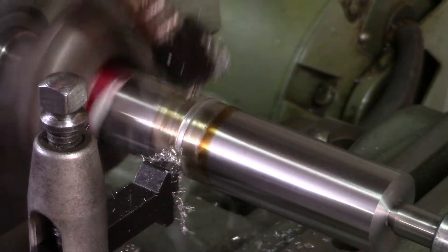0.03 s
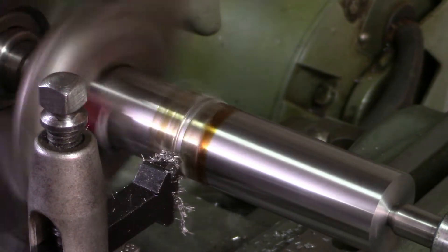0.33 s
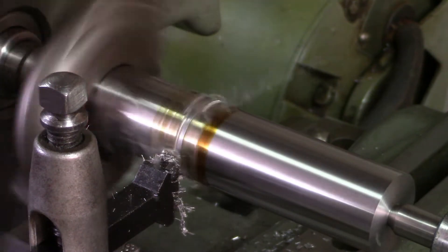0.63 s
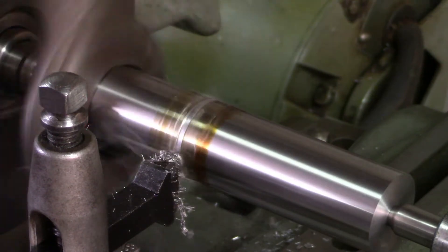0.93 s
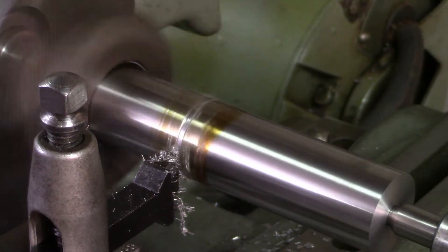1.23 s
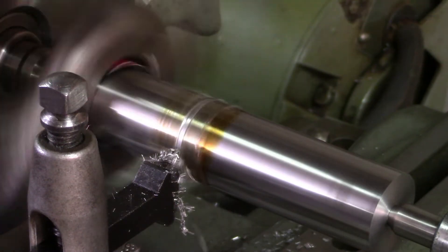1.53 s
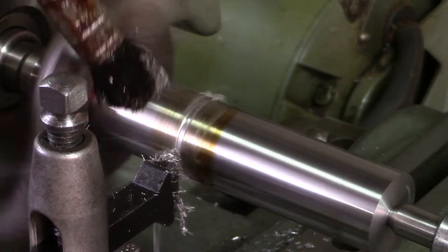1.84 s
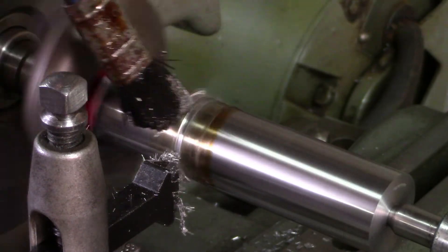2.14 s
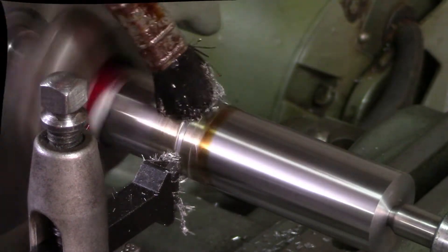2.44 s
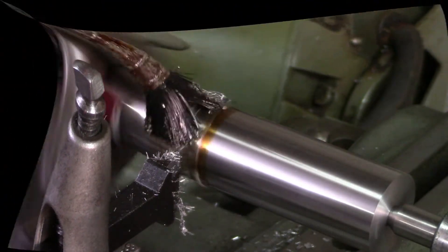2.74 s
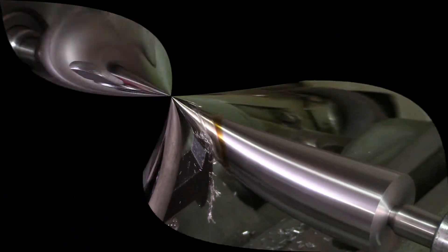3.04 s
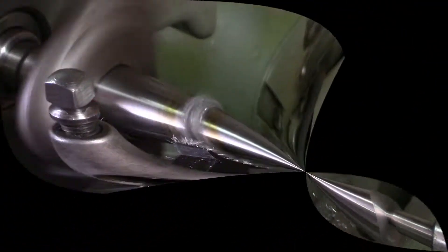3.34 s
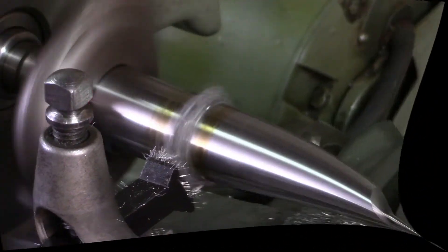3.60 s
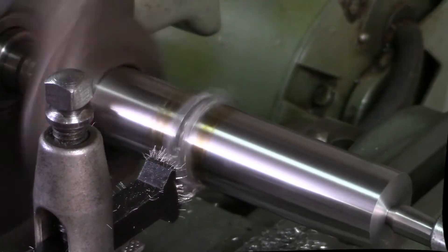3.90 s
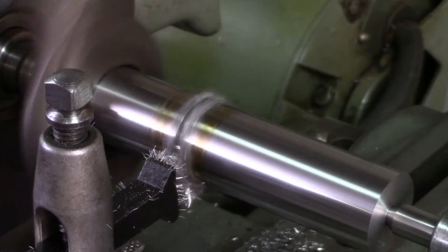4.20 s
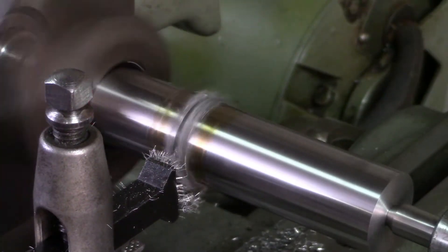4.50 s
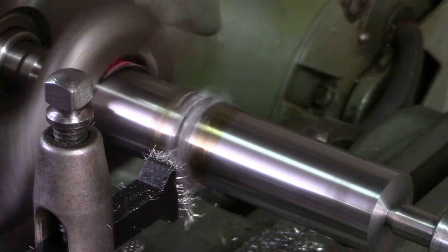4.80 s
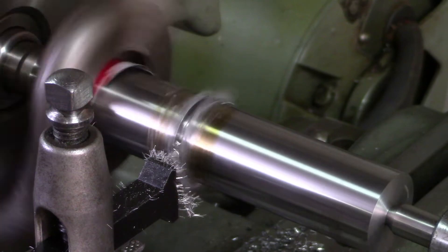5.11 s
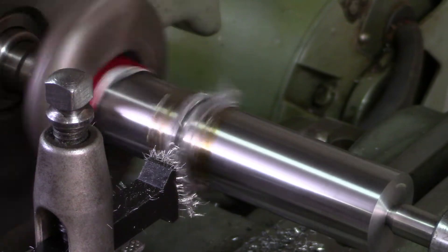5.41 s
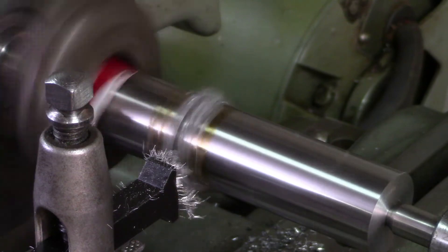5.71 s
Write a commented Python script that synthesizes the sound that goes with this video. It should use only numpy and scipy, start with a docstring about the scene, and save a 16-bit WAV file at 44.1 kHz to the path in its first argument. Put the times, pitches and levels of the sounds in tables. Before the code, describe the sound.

A lathe blade cuts into a spinning steel bar, close up in a workshop, over a steady gear rumble and faint whine. The cut rasps and sizzles, with small chip snaps, groans and thin whistles. About two seconds in, the blade squawks several times, once per turn. It then locks into a loud, harsh ringing chatter that breaks into short stutters.

```python
"""A lathe blade parts off a steel bar close by, over the rumble and whine of the headstock gears.
Brittle chips crack off in a rasp that swells with each turn; stick-slip adds groans and whistles.
Oiled, the blade squawks once a turn, swinging at its own pitch and slapping the bar each cycle.
It then chatters in a harsh ringing tone that breaks into stutters."""
import sys
import numpy as np
from scipy import signal
from scipy.fft import rfft, irfft
from scipy.io import wavfile
from scipy.ndimage import uniform_filter1d

SR = 44100
rng = np.random.default_rng(int(sys.argv[2]) if len(sys.argv) > 2 else 0)


def pcm_store(signal):
    """Save signal as 16-bit PCM."""
    levels = np.round(np.clip(np.atleast_2d(signal), -1, 1) * 32767)
    wavfile.write(sys.argv[1], SR, levels.astype(np.int16).T)


N = 253575
TIME_S = np.arange(N) / SR
FREQ_HZ = np.fft.rfftfreq(N, 1 / SR)
TURN_S, HIGH_SIDE_S = .268, 2.3  # one turn of the bar; a time when its high side meets the blade
LOCK_S = .003  # half the time the blade takes to lock or let go

# Resonances of blade, tool post and bar. Each row: centre in Hz, width in Hz, lift in dB.
STEEL_MODES = [(884, 23, 7), (940, 15, 4.5), (1380, 58, 0), (1692, 42, 8.5), (1866, 64, 7),
               (2260, 130, 7.5), (2474, 154, 7), (2730, 31, 2.5), (3000, 60, 6), (3120, 90, 8.5),
               (3271, 130, 7), (4700, 190, 6), (5300, 250, 5), (6400, 230, 7.5), (7030, 230, 8),
               (7680, 260, 7), (8640, 390, 6.5), (9780, 1200, 9), (12520, 380, 12.5), (14250, 400, 5)]
# Weight of the cut. Each row: time in seconds, relative rasp level in dB, relative fizz level in dB.
CUT_DB = [(0, -48.5, -45.5), (.05, -48, -50), (.09, -45, -43.5), (.16, -42, -43), (.22, -51, -50.5),
          (.37, -47, -49), (.42, -44.5, -46), (.435, -42, -43.5), (.88, -40, -43), (.97, -48.5, -47),
          (1.05, -42.5, -48.5), (1.19, -45.5, -47), (1.225, -40, -42), (1.56, -41.5, -44.5),
          (1.72, -44, -44.5), (1.83, -41, -45), (2.3, -47, -48.5), (2.76, -49, -51), (2.86, -46, -47),
          (3.7, -48.5, -49), (4.1, -40, -43), (4.3, -41.5, -44.5), (5.75, -42, -43)]
# Spectrum of the cut. Each row: frequency in Hz, gain in dB.
CUT_COLOUR_DB = [(260, -25), (450, -9), (570, 0.5), (712, -26), (903, 3.5), (1020, 5), (1290, 4),
                 (1710, -3.5), (2010, -10.5), (3090, -9), (4210, -21.5), (7070, -26), (11200, -44.5),
                 (12400, -47.5), (15500, -49)]
# Finest sizzle of the chips. Each row: time in seconds, level in dB.
SIZZLE_DB = [(.41, -85), (.43, -67), (.84, -65), (.96, -78), (1.17, -69), (1.23, -65), (1.5, -67),
             (2.0, -69), (2.76, -80), (2.84, -64), (3.22, -78), (3.4, -70), (4.3, -67.5), (5.75, -69)]
# Sizzle spectrum. Each row: frequency in Hz, gain in dB.
SIZZLE_COLOUR_DB = [(10500, -35), (11400, -10), (11900, -14), (12500, 0), (13200, -17), (14250, -3),
                    (15500, -13)]
# Headstock loudness. Each row: time in seconds, relative level in dB.
DRIVE_DB = [(0, -40.5), (2.2, -41.5), (2.72, -49), (2.87, -42.5), (3.5, -47), (3.67, -53), (4.3, -43.5),
            (5.75, -46)]
# Rumble spectrum. Each row: frequency in Hz, gain in dB.
RUMBLE_COLOUR_DB = [(20, -38), (55, -13), (102, -21), (120, -7), (160, -6), (195, -15), (250, -5),
                    (285, -9), (330, -1.5), (370, 5.5), (405, 2), (445, -9), (600, -1.5), (780, 0.5),
                    (1000, -8.5), (3000, -71)]
# Gear mesh tones. Each row: pitch in Hz, level at full drive in dB.
GEAR_TONES = [(389, -49.5), (479, -60), (641, -53.5), (801, -55.5)]
# Loose stick-slip. Each row: middle in seconds, length in seconds, top pitch in Hz, level in dB.
GROAN_RUBS = [(.01, .1, 924.7, -35.5), (.245, 0.11, 941, -32), (.54, 0.16, 1139, -34),
              (.96, 0.093, 994, -32.5), (1.11, .14, 1320, -34), (1.28, .16, 1008, -33.5),
              (1.6, 0.14, 1336, -34.5), (1.92, 0.072, 1309, -36), (2.925, 0.056, 1080, -37),
              (3.095, 0.023, 982, -33.5), (3.175, 0.069, 1228, -33.5)]
# Chip on the blade. Each row: middle in seconds, length in seconds, top pitch in Hz, level in dB.
WHISTLE_RUBS = [(.11, 0.083, 3245, -41), (.8, 0.18, 3050, -43), (.93, 0.065, 3037, -37.5),
                (1.1, .15, 2725, -37.5), (1.6, 0.092, 2780, -38), (1.7, 0.082, 3074, -35),
                (2.01, 0.065, 3113, -37), (2.2, 0.071, 3080, -39.5), (2.68, 0.064, 3180, -39.5),
                (2.85, 0.038, 3160, -48.5), (2.94, .1, 3354, -41.5), (3.08, 0.23, 3220, -48),
                (3.29, 0.034, 3060, -41), (3.49, 0.042, 3030, -41.5), (4.72, 0.28, 2650, -38.5),
                (5.49, 0.25, 2666, -38)]
# Thin hiss near 9 kHz, the high overtone of the whistles.
# Each row: middle in seconds, length in seconds, top pitch in Hz, level in dB.
HISS_RUBS = [(.08, .06, 9100, -56), (.33, .13, 9100, -59), (.88, 0.088, 8380, -49),
             (1.1, 0.18, 8980, -56.5), (1.63, .18, 8820, -50.5), (4.67, .06, 9150, -51),
             (5.48, 0.1, 9050, -58)]
# Groove rubbing the blade's flank. Each row: time in seconds, level in dB.
SWISH_DB = [(3.3, -61), (4.2, -51), (5.75, -52)]
# Large chips breaking. Each row: start in seconds, decay in seconds, crunch in dB, splinters in dB.
CHIP_SNAPS = [(.1471, .006, -33, -46), (.609, .009, -38.5, -47), (.6444, .009, -39.5, -46.5),
              (.7218, .014, -39, -58), (1.0204, .006, -41, -54), (1.2407, .006, -32, -53),
              (1.5489, .004, -39, -58), (4.0067, .004, -40, -56), (5.5971, .004, -39, -53)]
# Overtones of the blade's slap. Each row: multiple of the pitch, relative level in dB.
SLAP_OVERTONES = [(2, 5), (3, -3), (4, -9), (5, -27), (6, -21), (7, -27), (8, -28), (9, -64), (10, -44)]
# Spectrum of the grabbing edge. Each row: frequency in Hz, gain in dB.
BUZZ_COLOUR_DB = [(1400, -11), (2400, 7), (3500, 0), (4800, -12.5), (5800, -5.5), (7200, -0.5), (8500, -6),
                  (10000, -8.5), (11500, -26), (15500, -26)]
# Brief locks of the blade. Each row: start in seconds, length in seconds, pitch in Hz, level in dB.
STUTTER_LOCKS = [(1.106, 0.012, 1320, -25.5), (4.722, 0.033, 1185, -26), (4.771, 0.012, 1210, -27),
                 (4.802, 0.028, 1200, -22.5), (4.858, 0.035, 1168, -23), (4.913, 0.048, 1192, -23.5),
                 (4.974, 0.036, 1185, -30), (5.069, 0.034, 1155, -20.5), (5.131, 0.015, 1150, -27.5),
                 (5.269, 0.014, 1217, -24), (5.43, 0.052, 1199, -21), (5.536, 0.052, 1205, -16.5),
                 (5.623, 0.037, 1198, -32), (5.698, 0.049, 1197, -19.5)]
# Long spell of chatter. Each row: time in seconds, pitch in Hz, level in dB.
CHATTER_SPELL = [(3.258, 1144, -46), (3.299, 1142, -27.5), (3.365, 1112, -27.5), (3.405, 1169, -27),
                 (3.52, 1162, -27), (3.569, 1136, -27.5), (3.611, 1157, -25), (3.636, 1120, -23),
                 (3.676, 1184, -26.5), (3.79, 1162, -24.5), (3.83, 1118, -26), (3.874, 1179, -25),
                 (3.905, 1121, -22.5), (3.939, 1166, -17), (3.986, 1170, -24), (4.026, 1124, -21.5),
                 (4.059, 1164, -18), (4.1, 1131, -25), (4.2, 1155, -18.5), (4.269, 1145, -20.5),
                 (4.309, 1121, -21.5), (4.4, 1141, -22.5), (4.479, 1160, -23), (4.61, 1160, -25),
                 (4.665, 1227, -19.5), (4.684, 1223, -22.5)]
# Raggedness of the chatter. Each row: time in seconds, roughness from 0 to 1.
CHATTER_ROUGHNESS = [(3.3, .26), (3.85, .26), (4.1, .44), (4.6, .44), (5.0, .38), (5.45, .18)]
# The chatter's second harmonic. Each row: time in seconds, gain in dB.
CHATTER_OCTAVE_DB = [(3.3, -3), (3.6, -7), (3.8, -7.5), (4.2, -9), (4.31, -3.5), (4.42, -8), (5.1, -5),
                     (5.5, -1)]
# Hard slaps. Each row: middle in seconds, length in seconds, relative overtone level in dB, buzz in dB.
CHATTER_BITES = [(3.376, 0.056, -40, -47), (3.496, 0.0089, -35, -49), (3.553, 0.09, -33, -49),
                 (3.643, 0.015, -28.5, -51), (3.752, 0.011, -28.5, -58), (3.787, 0.021, -29.5, -58),
                 (3.833, 0.013, -35, -62), (3.875, 0.016, -33, -52), (3.94, .04, -31, -58.5),
                 (4.052, 0.031, -25.5, -57), (4.203, 0.013, -32, -60), (4.32, .03, -30, -57)]
# Breaks in the chatter. Each row: start in seconds, length in seconds.
CHATTER_LAPSES = [(3.329, .007), (3.42, .008), (3.46, .029), (3.596, .006), (3.686, .006), (3.726, .006),
                  (3.886, .007), (3.996, .01), (4.067, .007), (4.084, .008), (4.1, .011), (4.154, .007),
                  (4.214, .007), (4.253, .007), (4.268, .009), (4.369, .018), (4.43, .028), (4.5, .009),
                  (4.523, .009), (4.57, .022), (4.612, .007), (4.637, .012), (4.814, .008), (4.874, .007)]
# Locks of the oiled blade. Each row: start, length, build-up and time to peak in seconds,
# top pitch in Hz, relative tone level in dB, relative overtone level in dB.
SQUAWK_LOCKS = [(1.821, .056, .002, .028, 1260, -24, -31), (2.04, .148, .06, .078, 1205, -23.5, -31),
                (2.304, .177, .004, .07, 1195, -23, -31), (2.569, .156, .005, .078, 1160, -23.5, -37.5),
                (2.835, .07, .002, .045, 1130, -26.5, -46)]
# Buzzing grabs of the edge. Each row: start in seconds, length in seconds, level in dB.
EDGE_GRABS = [(1.822, .008, -36), (2.082, .008, -26), (2.106, 0.022, -33), (2.305, 0.014, -36),
              (2.335, 0.017, -32.5), (2.372, 0.024, -28.5), (2.57, 0.016, -30), (2.606, 0.0069, -35),
              (2.643, 0.035, -41), (2.834, .012, -36)]
# Spectrum of the slapping edge's scrape. Each row: frequency in Hz, gain in dB.
SCRAPE_COLOUR_DB = [(700, -25), (1350, -37), (2000, 17.5), (3600, 7), (5000, -4), (9000, -2), (12000, -40)]
# Microphone low cut. Each row: frequency in Hz, gain in dB.
LOW_CUT_DB = [(60, -14), (100, -10), (122, -0.5)]
# Stereo width. Each row: frequency in Hz, side gain in dB.
SIDE_DB = [(30, -19), (100, -23.5), (600, -27.5), (1100, -21), (7000, -21.5), (13000, -24)]


def gain_of(db):
    """Decibels to amplitude."""
    return 10 ** (np.asarray(db) / 20)


def unit_rms(x):
    """Scales to rms 1."""
    return x / np.sqrt(np.mean(abs(x) ** 2) + 1e-20)


def follow(rows):
    """Columns of a time curve at every sample."""
    times_s, *columns = np.transpose(rows)
    return [np.interp(TIME_S, times_s, column) for column in columns]


def nearest(rows):
    """Columns of the nearest event at every sample."""
    rows = np.array(rows)
    borders_s = (rows[1:, 0] + rows[:-1, 0]) / 2
    return rows[np.searchsorted(borders_s, TIME_S)].T


def spectrum(points):
    """Gain at every frequency from (Hz, dB) points."""
    hz, db = np.transpose(points)
    return gain_of(np.interp(np.log(FREQ_HZ + 1), np.log(hz), db))


def filtered(x, gain):
    """Applies a gain at every frequency."""
    return irfft(rfft(x) * gain, N)


def coloured(x, gain):
    """Filters, then scales to rms 1."""
    return unit_rms(filtered(x, gain))


def flutter(width_hz):
    """Complex low-passed noise, rms 1."""
    noise = rng.standard_normal(N) + 1j * rng.standard_normal(N)
    return unit_rms(np.fft.ifft(noise / (1 + (np.fft.fftfreq(N, 1 / SR) / width_hz) ** 2)))


def waver(width_hz):
    """Real low-passed noise, rms 1."""
    return unit_rms(flutter(width_hz).real)


def phasor(hz):
    """Unit phasor at a moving frequency."""
    return np.exp(2j * np.pi * np.cumsum(hz) / SR)


def gate(start_s, length_s, edge_s=LOCK_S):
    """Flat-topped gate with sloped edges."""
    release_s = start_s + max(length_s, 2 * edge_s) - edge_s
    corners_s = [start_s - edge_s, start_s + edge_s, release_s, start_s + length_s + edge_s]
    return np.interp(TIME_S, corners_s, [0, 1, 1, 0])


def bar_turn(offset_turns):
    """Share of a turn since the bar passed the offset."""
    return ((TIME_S - HIGH_SIDE_S) / TURN_S - offset_turns) % 1


def steel():
    """Gain of the ringing metal at every frequency."""
    lifts_db = (db / (1 + (2 * (FREQ_HZ - hz) / width_hz) ** 2) for hz, width_hz, db in STEEL_MODES)
    return gain_of(sum(lifts_db))


def workshop(x, wet_db, t60_s):
    """Adds dense reflections from machine bed and walls."""
    t = np.arange(SR // 2) / SR
    taps = rng.standard_normal(len(t)) * (rng.random(len(t)) < 2000 / SR)
    taps *= (t > .002) * gain_of(-60 * t / t60_s)
    wet = signal.fftconvolve(x, taps / np.linalg.norm(taps))[:N]
    return (x + gain_of(wet_db) * wet) / np.hypot(1, gain_of(wet_db))


def fractures(per_s, spread_db, hiss):
    """Tiny cracks of uneven size over the hiss of rubbing."""
    sizes = gain_of(spread_db * np.minimum(rng.exponential(1, N), 4.3)) * rng.choice([-1, 1], N)
    cracks = unit_rms(sizes * (rng.random(N) < per_s / SR))
    return unit_rms(cracks + hiss * rng.standard_normal(N))


def cutting():
    """Steel shears off in cracks that ring the tool: rasp below, fizz and sizzle of chips above."""
    rasp_db, fizz_db = follow(CUT_DB)
    sizzle_db, = follow(SIZZLE_DB)
    cracks = workshop(fractures(per_s=2600, spread_db=2.5, hiss=.88), wet_db=-6.5, t60_s=.094)
    chips = cracks + .27 * fractures(per_s=1500, spread_db=2.5, hiss=0)
    chips *= gain_of(.99 * waver(22))
    ring = spectrum(CUT_COLOUR_DB) * steel()
    low_share = 1 / (1 + (FREQ_HZ / 3800) ** 8)
    swell_db = np.cos(2 * np.pi * bar_turn(.41))
    rasp = coloured(cracks, ring * low_share) * gain_of(rasp_db + 8 + swell_db)
    fizz = coloured(chips, ring * (1 - low_share)) * gain_of(fizz_db + 1 + swell_db)
    sizzle = coloured(chips, spectrum(SIZZLE_COLOUR_DB)) * gain_of(sizzle_db)
    return rasp + fizz + sizzle


def headstock():
    """Gears and bearings rumble in the casting, with wavering mesh tones."""
    drive_db, = follow(DRIVE_DB)
    rumble = coloured(rng.standard_normal(N), spectrum(RUMBLE_COLOUR_DB))
    rumble *= gain_of(drive_db - 1 + 1.2 * waver(23))
    whine = np.zeros(N)
    for hz, db in GEAR_TONES:
        mesh = np.exp(2j * np.pi * hz * TIME_S) * (1 + 1.1 * flutter(8))
        whine += gain_of(db) * unit_rms(mesh.real)
    return rumble + whine * gain_of(.55 * (drive_db - drive_db.max()))


def stick_slip(hz, width_hz):
    """Irregular slipping around a pitch, rung through the steel; rms 1."""
    return coloured((phasor(hz) * flutter(width_hz)).real, steel())


def rubs(rows, arch, width_hz):
    """Stick-slip tones swell and fade, their pitch arching with the pressure."""
    middle_s, span_s, top_hz, _ = nearest(rows)
    hz = top_hz * (1 - arch * np.minimum((2 * (TIME_S - middle_s) / span_s) ** 2, 2))
    level = sum(gain_of(db) / np.cosh(np.minimum(abs(TIME_S - at_s) / length_s * np.pi, 20))
                for at_s, length_s, _, db in rows)
    return stick_slip(hz, width_hz) * level


def scraping():
    """The cut groans, chips whistle with a thin hiss on top; the groove's swish falls each turn."""
    swish_db, = follow(SWISH_DB)
    turn = bar_turn(.9)
    flank = (phasor(6430 - 549 * turn) * flutter(150)).real
    swish = unit_rms(flank * np.sin(np.pi * turn ** .49)) * gain_of(swish_db)
    groans = rubs(GROAN_RUBS, arch=.14, width_hz=175)
    whistles = rubs(WHISTLE_RUBS, arch=.02, width_hz=110)
    hisses = rubs(HISS_RUBS, arch=.03, width_hz=520)
    return groans + whistles + hisses + swish


def snaps():
    """Large chips break in short, bright crunches with a splintery top."""
    bright = spectrum([(500, -32), (3000, 28), (7000, 25), (10000, 15), (11500, -10), (15500, -2)])
    crunch = coloured(rng.standard_normal(N), bright * steel())
    splinters = coloured(rng.standard_normal(N), spectrum([(7000, -28), (10000, -3), (15500, -7)]))
    out = np.zeros(N)
    for start_s, decay_s, crunch_db, splinters_db in CHIP_SNAPS:
        envelope = (TIME_S >= start_s) * np.exp(-abs(TIME_S - start_s) / decay_s)
        out += envelope * (gain_of(crunch_db) * crunch + gain_of(splinters_db) * splinters)
    return out


def blade(hz, swing, bite, grab, *, jitter, throb, blur, brighten, neutral_db, octave_db, buzz_from):
    """The blade rings (swing), slaps the bar each cycle (bite) and buzzes in ragged pulses (grab)."""
    cycle = phasor(hz * (1 + jitter * waver(89)))
    tone = np.sqrt(2) * (swing * cycle * (1 + throb * flutter(54))).real
    bite_db = 20 * np.log10(bite + 1e-6)
    tilt_db_per_octave = brighten * (bite_db - neutral_db)  # harder slaps are brighter
    slap = np.zeros(N)
    for k, db in SLAP_OVERTONES:
        level = gain_of(db + tilt_db_per_octave * np.log2(k / 3) + octave_db * (k == 2))
        slap += level * (cycle ** k * (1 + blur * flutter(32 * k))).real
    slap *= gain_of(bite_db + 1 + 1.6 * waver(20)) / np.hypot(1, blur)
    pulses = sum((cycle ** k * (1 + 1.4 * flutter(300))).real for k in range(buzz_from, 14))
    buzz = coloured(pulses, spectrum(BUZZ_COLOUR_DB)) * grab
    return workshop(tone, wet_db=-17, t60_s=.15) + workshop(slap + buzz, wet_db=-10, t60_s=.1)


def lapses(rough, depth=.8, slip_rad=1.6, shudder_hz=74):
    """The swing collapses briefly and restarts out of step; when ragged it also shudders."""
    dips = [gate(start_s, length_s) for start_s, length_s in CHATTER_LAPSES]
    phase_rad = np.cumsum(sum(rng.uniform(-slip_rad, slip_rad) * dip / dip.sum() for dip in dips))
    shake = (flutter(34) * np.exp(2j * np.pi * shudder_hz * TIME_S)).real
    shudder = .85 * np.maximum(rough - .12, 0) * shake
    return (1 - depth * sum(dips)) * (1 + shudder) * np.exp(1j * phase_rad)


def chatter():
    """The blade stutters once early, later locks into a long tone; drying, it groans and stutters."""
    spell_hz, spell_db = follow(CHATTER_SPELL)
    rough, = follow(CHATTER_ROUGHNESS)
    octave_db, = follow(CHATTER_OCTAVE_DB)
    rasp_db, _ = follow(CUT_DB)
    _, _, stutter_hz, _ = nearest(STUTTER_LOCKS)
    start_s, end_s = CHATTER_SPELL[0][0], CHATTER_SPELL[-1][0]
    spell = gate(start_s, end_s - start_s)
    stutters = sum(gain_of(db) * gate(at_s, length_s) for at_s, length_s, _, db in STUTTER_LOCKS)
    hz = np.where(spell > 0, spell_hz * (1 + .008 * waver(25)), stutter_hz)
    swing = (spell * gain_of(spell_db) + stutters) * lapses(rough)
    bite = spell * gain_of(-40) + stutters * gain_of(-20)
    grab = np.zeros(N)
    for middle_s, length_s, bite_db, buzz_db in CHATTER_BITES:
        press = np.exp(-2 * ((TIME_S - middle_s) / length_s) ** 2)
        bite = np.hypot(bite, press * gain_of(bite_db))
        grab += press * gain_of(buzz_db)
    groan_db = rasp_db + 9.5 + 8 * (rough - rough.max())
    groan = stick_slip(hz, width_hz=86) * gain_of(groan_db) * (TIME_S > start_s)
    return groan + blade(hz, swing, bite, grab, jitter=.028 * rough, throb=.55 * rough, blur=2 * rough,
                         brighten=.4, neutral_db=-37, octave_db=octave_db, buzz_from=5)


def squawks(scoop_s=.04, rough=.62):
    """Once a turn the oiled blade groans upward, catches in a ringing squawk and sags as it lets go."""
    hz, swing, bite, groan = np.zeros((4, N))
    for start_s, length_s, build_s, peak_s, top_hz, db, bite_db in SQUAWK_LOCKS:
        t = TIME_S - start_s
        arch = np.interp(t, [-scoop_s, -LOCK_S, LOCK_S, peak_s, .125, .195, TURN_S - scoop_s],
                         [.63, .81, .93, 1, .955, .92, .63])
        hz = np.where((t > -scoop_s) | (hz == 0), top_hz * arch, hz)
        before_s, after_s = np.maximum(peak_s - t, 0), np.maximum(t - peak_s, 0)
        choke_db = -8 * np.exp(-((t - peak_s) / .02) ** 2)  # hard slaps choke the tone
        lock = gate(start_s, length_s) * np.clip((t + LOCK_S) / build_s, 0, 1)
        swing += lock * gain_of(db + choke_db - 14 * abs(t))
        bite += lock * gain_of(bite_db - 191 * before_s - 162 * after_s)
        slipping = gate(start_s - .73 * scoop_s, length_s + 2.06 * scoop_s, edge_s=scoop_s / 2)
        groan += slipping * gain_of(db - 3.5 - 2.5 * (t < 0) - 20 * before_s - 50 * after_s)
    grab = sum(gain_of(db) * gate(at_s, length_s, edge_s=.00032) for at_s, length_s, db in EDGE_GRABS)
    ringing = blade(hz, swing, bite, grab, jitter=.026 * rough, throb=.8 * rough, blur=1.35 * rough,
                    brighten=.071, neutral_db=-15, octave_db=-1.5, buzz_from=2)
    cracks = fractures(per_s=990, spread_db=9, hiss=.3)
    scrape = coloured(cracks, spectrum(SCRAPE_COLOUR_DB) * steel()) * bite * gain_of(-11)
    return ringing + scrape + groan * stick_slip(hz, width_hz=100)


def scene():
    """All sources lie nearly straight ahead; a faint, fluttering side signal gives width."""
    lathe = cutting() + snaps() + scraping() + squawks() + chatter() + headstock()
    mid = filtered(lathe, spectrum(LOW_CUT_DB))
    side = filtered((signal.hilbert(mid) * flutter(40)).real, spectrum(SIDE_DB))
    return np.array([gain_of(.66) * mid + side, gain_of(.5) * mid - side])


def record(dry, lopsided=.066, ceiling_db=-15.5, release_db_per_s=150, cutoff_hz=15680):
    """Slightly lopsided microphone, fast limiter, then low-pass."""
    x = dry + lopsided * (dry ** 2 - np.mean(dry ** 2))
    over_db = np.maximum(20 * np.log10(abs(x).max(0) + 1e-9) - ceiling_db, 0)
    recovery_db = TIME_S * release_db_per_s
    held_db = np.maximum.accumulate(over_db + recovery_db) - recovery_db
    limited = x / gain_of(uniform_filter1d(held_db, size=24))
    low_pass = signal.firwin(1023, cutoff_hz, window=("kaiser", 9), fs=SR)
    return signal.oaconvolve(limited, low_pass[None], "same")


dry = scene()
out = record(dry)
pcm_store(out)
```